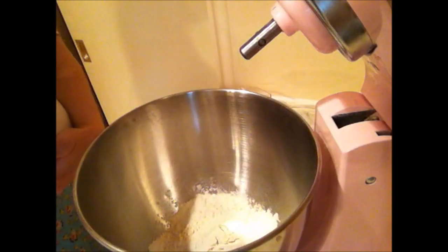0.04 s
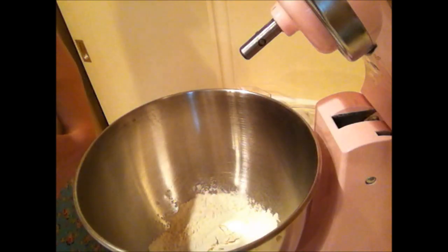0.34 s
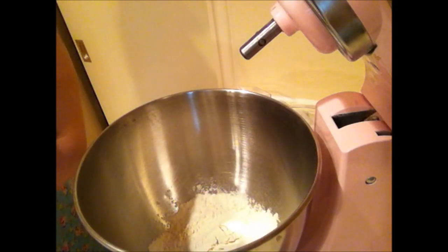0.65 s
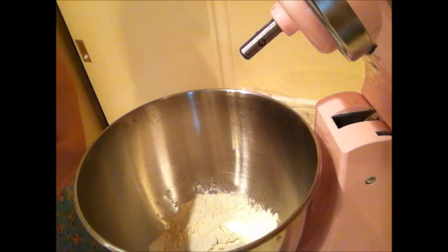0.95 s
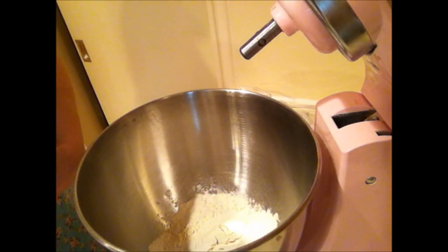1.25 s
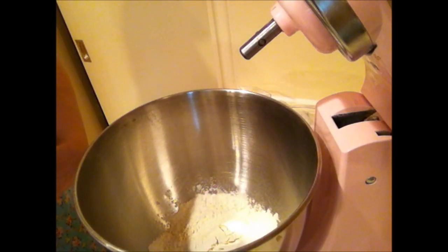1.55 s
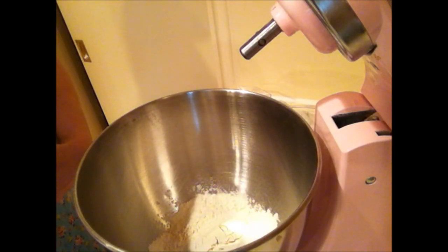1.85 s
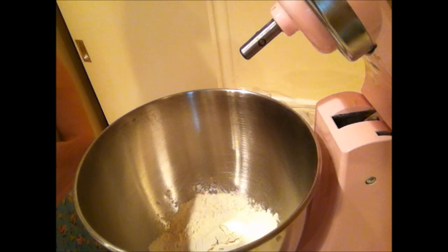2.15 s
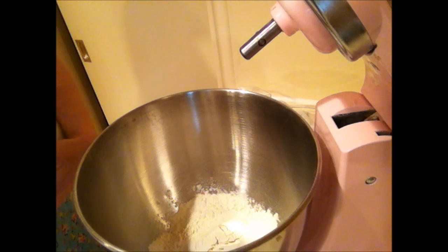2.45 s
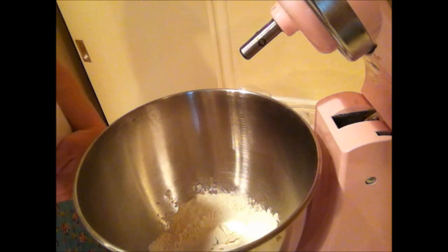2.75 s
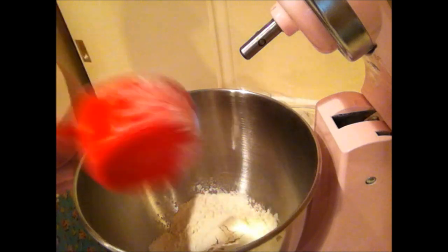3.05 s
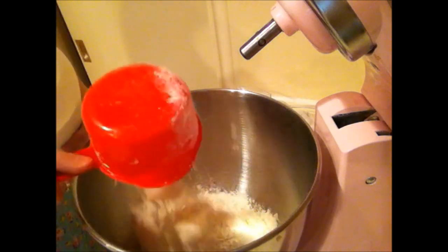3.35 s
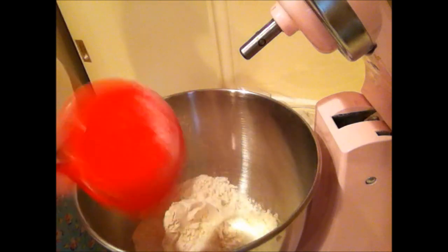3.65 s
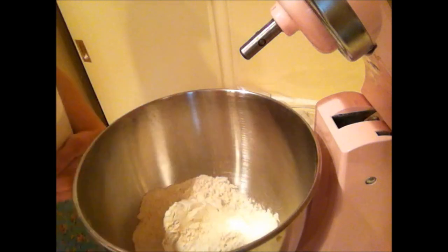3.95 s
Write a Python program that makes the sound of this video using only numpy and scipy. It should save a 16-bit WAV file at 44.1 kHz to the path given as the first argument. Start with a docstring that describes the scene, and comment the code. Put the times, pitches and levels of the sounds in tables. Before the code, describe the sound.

Light taps and scrapes of a cup in flour, ending in two sharp knocks on a bowl.

```python
"""A small kitchen, where an appliance hums and churns faintly. Flour is scooped and levelled in a
plastic measuring cup: light taps crunch, ring the shell and thump the laden body, and scrapes hiss
as tiny slips in the powder. The flour is tipped into a steel mixing bowl and lands in soft thuds.
The empty cup is knocked twice on the rim, and the bowl rings."""
import sys
import numpy as np
from scipy import signal
from scipy.fft import rfft, irfft
from scipy.io import wavfile
from scipy.ndimage import uniform_filter1d

SR = 44100
rng = np.random.default_rng(int(sys.argv[2]) if len(sys.argv) > 2 else 0)


def inscribe(sig):
    """Save sig as 16-bit PCM at rate SR to the path in sys.argv[1].

    A 1-D sig is mono; a 2-D sig holds one channel per row.
    Samples are clipped to [-1, 1] before scaling.
    """
    pcm = np.round(np.clip(np.atleast_2d(sig).T, -1, 1) * 32767)
    wavfile.write(sys.argv[1], SR, pcm.astype(np.int16))


N = 176400
T = np.arange(N) / SR


def from_db(db):
    """Decibels to gain."""
    return 10 ** (np.asarray(db) / 20)


def unit_rms(x):
    """Scale to rms 1."""
    return x / np.sqrt(np.mean(x ** 2) + 1e-20)


def colour(x, spectrum):
    """Shape a steady signal with an EQ curve; rms 1."""
    hz, db = np.transpose(spectrum)
    bins_hz = np.maximum(np.fft.rfftfreq(N, 1 / SR), 1)
    gain = from_db(np.interp(np.log(bins_hz), np.log(hz), db))
    return unit_rms(irfft(rfft(x) * gain, N))


def noise(spectrum):
    """Coloured noise, rms 1."""
    return colour(rng.standard_normal(N), spectrum)


def clicks(times, db):
    """Single impulses at given times and levels."""
    out = np.zeros(N)
    np.add.at(out, np.clip(np.asarray(times) * SR, 0, N - 1).astype(int), from_db(db))
    return out


def decay(hits, t60):
    """Every impulse starts an exponential decay."""
    return signal.lfilter([1], [1, -np.exp(-np.log(1000) / (t60 * SR))], hits + 1e-18)


def low_cut(x, hz):
    """Second-order high-pass."""
    return signal.lfilter(*signal.butter(2, hz, "high", fs=SR), x)


def ring(force, modes, sign=-1):
    """Damped modes, neighbours opposed or (sign=1) in step; each is weak below half its pitch."""
    out = 0
    for k, (hz, db, t60) in enumerate(modes):
        r, w = np.exp(-np.log(1000) / (t60 * SR)), 2 * np.pi * hz / SR
        motion = signal.lfilter([0, np.sin(w)], [1, -2 * r * np.cos(w), r * r], force + 1e-18)
        out = out + sign ** k * from_db(db) * low_cut(motion, hz / 2)
    return out


# EQ of the room tone (frequency [Hz], level [dB])
AIR_EQ = [(25, -9), (60, -22.5), (120, -2), (250, 3), (320, -23), (450, -1), (800, -9), (2500, -21),
          (9000, -29.5), (16000, -39.5)]


def room_air():
    """A steady, dark bed of air."""
    return from_db(-54.5) * noise(AIR_EQ)


# EQ of the churn and of the splash that opens each turn (frequency [Hz], level [dB])
CHURN_EQ = [(150, -26), (320, -7), (390, 4.5), (520, -14.5), (700, -6.5), (850, -25.5), (6000, -59)]
SLOSH_EQ = [(300, -38), (660, 0), (1800, -52)]
# narrow noise bands of the hum (frequency [Hz], level [dB])
HUM_BANDS = [(270, -59), (470, -60)]


def appliance():
    """Over a steady hum, it churns and sloshes about ten times a second, slowly getting quieter."""
    period_s, peak_s, lead_s = 0.1023, 0.275, 0.018
    swing_db, fade_db_per_s, slosh_spread_db = 6, 1.05, 3
    turn = np.cos(2 * np.pi * (T - peak_s) / period_s)
    churn = noise(CHURN_EQ) * from_db(-55.5 + swing_db * turn - fade_db_per_s * T)
    hum = sum(from_db(db) * unit_rms(ring(rng.standard_normal(N), [(hz, 0, 0.45)]))
              for hz, db in HUM_BANDS)
    times = np.arange(peak_s % period_s, T[-1], period_s) - lead_s
    slosh_db = -53.5 - fade_db_per_s * times + slosh_spread_db * rng.standard_normal(len(times))
    slosh = noise(SLOSH_EQ) * decay(clicks(times, slosh_db), t60=0.1)
    return churn + slosh + hum


# light taps on the full cup, ahead of each layer's trim
# (time [s], level [dB], thump offset [dB], edge offset [dB], shell brightness [dB/octave])
CUP_TAPS = [(0.0533, -30, -25, -5.5, 0), (0.0588, -33.5, -12, -11, 2), (0.0875, -25.5, -23, -14, 5.5),
            (0.0942, -33, -6.5, -12, -1.5), (1.0490, -41, -8, -8, 6), (1.4042, -45, -25, -10.5, 4),
            (1.5585, -34, -11, -12.5, 7), (1.7113, -45.5, -10, -10, 1), (1.8346, -38.5, 1.5, -18, 0),
            (1.9758, -41.5, 6, -14.5, -7.5), (2.0935, -42.5, 8, -14, -6), (2.14, -41.5, -19, -18, -1),
            (2.2207, -46.5, 5.5, -9.5, -2), (2.2653, -44, -29, -18, 3), (2.3895, -38.5, -2.5, -20, 0.5),
            (2.522, -28.5, -4.5, -24, -4), (2.5552, -41.5, -13, -12.5, -4), (2.6915, -39.5, -3.5, 1.5, -2),
            (2.7208, -39, -11, -13, -1.5), (2.7836, -47, -4, 2, -5)]
# modes of the full cup's shell, as matching lists (frequency [Hz], level [dB], t60 [s])
SHELL_MODE_HZ = [780, 980, 1580, 2180, 2590, 3050, 3620, 3760, 4030, 4700]
SHELL_LEVEL_DB = [-0.5, -1, -6.5, -7, -5.5, 2, 2, 0, 2, -0.5]
SHELL_DECAY_S = [.03, .03, .038, .038, .022, .026, .026, .018, .02, .026]
SHELL_MODES = list(zip(SHELL_MODE_HZ, SHELL_LEVEL_DB, SHELL_DECAY_S))
# modes of its flour-laden body (frequency [Hz], level [dB], t60 [s])
BODY_MODES = [(170, -3.5, 0.036), (255, -4, 0.056), (369.5, -1.5, 0.069)]
# EQ of a tap's crunch and of its crisp edge (frequency [Hz], level [dB])
CRUNCH_EQ = [(200, -12), (900, 0.5), (4800, 1), (5500, -28)]
EDGE_EQ = [(1000, -16), (3500, 11), (5500, 1.5), (7500, 5.5), (10000, 1), (13000, -5.5), (16000, -26)]


def cup_taps():
    """A gritty contact crunches and rings the shell; the heavy body thumps just after."""
    shell_trim_db, thump_trim_db, crunch_trim_db, edge_trim_db = -8.5, 5, -11, -0.5
    contact_s, thump_lag_s, pivot_hz = 0.0033, 0.002, 2800
    grip_detune, spot_spread_db = 0.01, 2.5  # the modes shift with the grip and the spot touched
    shell, t = np.zeros(N + SR), T[:SR // 8]
    for start, level_db, _, _, brightness in CUP_TAPS:
        force = rng.standard_normal(len(t)) * np.exp(-t / contact_s)
        modes = [(hz * (1 + grip_detune * rng.normal()),
                  mode_db + brightness * np.log2(hz / pivot_hz) + spot_spread_db * rng.normal(), t60)
                 for hz, mode_db, t60 in SHELL_MODES]
        first = int(start * SR)
        shell[first:first + len(t)] += from_db(level_db) * ring(force / np.linalg.norm(force), modes)
    times, db, thump_db, edge_db, _ = np.transpose(CUP_TAPS)
    thump = ring(clicks(times + thump_lag_s, db + thump_db + thump_trim_db), BODY_MODES)
    crunch = noise(CRUNCH_EQ) * decay(clicks(times, db + crunch_trim_db), t60=0.053)
    edge = noise(EDGE_EQ) * decay(clicks(times, db + edge_db + edge_trim_db), t60=0.06)
    return from_db(shell_trim_db) * shell[:N] + low_cut(thump, hz=130) + crunch + edge


# strokes through the flour (time [s], attack [s], hold [s], release to -30 dB [s], level [dB],
# shell share [0-1], lip pitch [Hz], lip level re stroke [dB])
SCRAPE_STROKES = [(0.061, 0.0047, 0.04, 0.15, -41, 0.63, 3550, -11),
                  (0.269, 0.088, 0.031, 0.31, -54, 0.04, 4600, -9),
                  (0.439, 0.02, 0.02, 0.31, -65, 0.02, 4040, -4),
                  (0.836, 0.051, 0.053, 0.066, -54.5, 0.01, 4300, -6),
                  (0.942, 0.015, 0.094, 0.031, -51.5, 0.35, 4250, -3.5),
                  (1.487, 0.017, 0.016, 0.061, -57.5, 0.44, 4130, -7),
                  (2.105, 0.02, .012, 0.045, -53, 0.9, 3700, -14),
                  (2.243, 0.028, .005, 0.018, -54, 0.9, 3700, -12),
                  (3.566, 0.033, 0.021, 0.063, -59, 0, 4270, -22)]
# EQ of the powder's hiss (frequency [Hz], level [dB])
POWDER_EQ = [(300, -27), (1000, -6), (4200, 3.5), (5300, 0), (6500, 4), (9000, 1.5), (12000, -4),
             (16000, -17)]


def scrapes():
    """Tiny slips clump as the cup catches; they hiss in the powder and ring the shell and the lip."""
    slips_per_s, spread_db, catch_db, catch_s = 4000, 1.5, 2.5, 0.006
    slips = (rng.random(N) < slips_per_s / SR) * rng.choice([-1, 1], N)
    slips = slips * from_db(spread_db * np.minimum(rng.exponential(1, N), 4))
    catching = unit_rms(uniform_filter1d(rng.standard_normal(N), size=int(catch_s * SR)))
    slips = slips * from_db(catch_db * catching)
    hiss = colour(slips, POWDER_EQ)
    shell = unit_rms(ring(slips, SHELL_MODES))
    out = 0
    for start, attack, hold, release, db, share, lip_hz, lip_db in SCRAPE_STROKES:
        t = T - start
        push = np.clip(t / attack, 0, 1) * from_db(-30 * np.maximum(t - attack - hold, 0) / release)
        lip = from_db(lip_db) * unit_rms(ring(slips, [(lip_hz, 0, 0.036)]))
        out = out + from_db(db) * push * (np.sqrt(share) * shell + np.sqrt(1 - share) * hiss + lip)
    return out


# slides across the flour (peak time [s], Gaussian half-width [s], level [dB])
SLIDES = [(1.523, 0.049, -53.5), (2.362, 0.046, -54)]
# their muted EQ (frequency [Hz], level [dB])
SLIDE_EQ = [(500, -6), (1200, 0.5), (1900, -4), (3000, -18.5), (9000, -34)]


def slides():
    """Soft slides across the flour swell and fade."""
    swells = sum(from_db(db) * np.exp(-0.5 * ((T - peak) / width) ** 2) for peak, width, db in SLIDES)
    return noise(SLIDE_EQ) * swells


# flour dropping into the bowl (time [s], level [dB], t60 [s], rustle level re thud [dB])
LUMPS = [(3.382, -42, 0.23, -10.5), (3.476, -48.5, 0.44, 1.5), (3.536, -54, 0.095, 14),
         (3.57, -53.5, 0.14, 13), (3.583, -46.5, 0.085, 10.5)]
# EQ of the thud and of the rustle (frequency [Hz], level [dB])
THUD_EQ = [(50, -26), (110, -10), (200, 5), (300, -11), (900, -39)]
RUSTLE_EQ = [(250, -34), (450, 6), (530, -10), (680, -4), (900, -15), (1300, -17), (10000, -43)]


def flour_fall():
    """Soft lumps land with a thud and a hollow rustle."""
    thud, rustle, out = noise(THUD_EQ), noise(RUSTLE_EQ), 0
    for start, db, t60, rustle_db in LUMPS:
        envelope = uniform_filter1d(decay(clicks([start], db), t60), size=130)  # 3 ms soft attack
        out = out + envelope * (thud + from_db(rustle_db) * rustle)
    return out


# the empty cup hits the rim (time [s])
KNOCK_TIMES = [3.795, 3.951]
# drive of each knock's layers (crack [dB], cup [dB], counter [dB], bowl [dB])
KNOCK_LEVELS = [(-15, -14, -21, -39.5), (-13, -9, -27, -33.5)]
# EQ of the crack and of the bowl's shimmer (frequency [Hz], level [dB])
CRACK_EQ = [(300, -8), (480, 8), (1000, -2), (2000, -8), (4500, 2.5), (5600, -6), (7800, 0.5), (10000, -8),
            (12500, -18), (16000, -38)]
# modes of the empty cup, as matching lists (frequency [Hz], level [dB], t60 [s])
CUP_MODE_HZ = [462, 600, 715, 912, 1340, 2950, 4470, 7400]
CUP_LEVEL_DB = [5, 1, 0, 1.5, -5, -11, -4, -8]
CUP_DECAY_S = [.042, .028, .026, .042, .025, .022, .035, .03]
# modes of the steel bowl, as matching lists (frequency [Hz], level [dB], t60 [s])
BOWL_MODE_HZ = [430, 597, 682, 786, 1034, 1400, 1760, 4395, 4484]
BOWL_LEVEL_DB = [4, -1, 6, -6, -4, -7, -1, -5, -4]
BOWL_DECAY_S = [.25, .17, .75, .6, .5, .5, .14, .28, .28]
# modes of the counter (frequency [Hz], level [dB], t60 [s])
COUNTER_MODES = [(152.8, -3.5, 0.22), (200.4, 5.5, 0.065)]


def rim_knocks():
    """The cup cracks against the rim and touches again at once; cup, bowl and counter all ring."""
    recontact_s, recontact_db = 0.002, -1
    times = np.array(KNOCK_TIMES)
    crack_db, cup_db, counter_db, bowl_db = np.transpose(KNOCK_LEVELS)
    contacts = clicks(times, crack_db) + clicks(times + recontact_s, crack_db + recontact_db)
    crack = from_db(2.5) * noise(CRACK_EQ) * decay(contacts / 2, t60=0.04)
    cup = ring(clicks(times, cup_db), zip(CUP_MODE_HZ, CUP_LEVEL_DB, CUP_DECAY_S), sign=1)
    bowl = ring(clicks(times, bowl_db), zip(BOWL_MODE_HZ, BOWL_LEVEL_DB, BOWL_DECAY_S))
    shimmer = noise(CRACK_EQ) * decay(clicks(times, bowl_db + 2), t60=0.22)  # dense high bowl modes
    thud = ring(clicks(times, counter_db), COUNTER_MODES)
    return low_cut(crack + cup, hz=400) + bowl + shimmer + thud


def kitchen_reverb(x):
    """Diffuse reflections whose treble dies sooner."""
    low_t60_s, treble_t60_s, split_hz, predelay_s = 0.39, 0.3, 3100, 0.014
    t, white = T[:SR // 2], rng.standard_normal(SR // 2)
    low = signal.sosfilt(signal.butter(2, split_hz, fs=SR, output="sos"), white)
    tail = low * from_db(-60 * t / low_t60_s) + (white - low) * from_db(-60 * t / treble_t60_s)
    tail = tail * (t > predelay_s)
    return signal.fftconvolve(x, tail / np.linalg.norm(tail))[:N]


def scene():
    """Mono mix: the handling with a little reverb, over the air and the appliance."""
    handling = cup_taps() + scrapes() + slides() + flour_fall() + rim_knocks()
    return (handling + from_db(-15.5) * kitchen_reverb(handling) + room_air() + appliance())[None]


def record(dry):
    """The loudest peaks are rounded; a small microphone loses the deep bass and the very top."""
    band_hz, cutoff_hz = [58, 12500], 16000
    mic = signal.sosfilt(signal.butter(2, band_hz, "band", fs=SR, output="sos"), np.tanh(dry))
    return signal.sosfilt(signal.cheby2(14, 60, cutoff_hz, fs=SR, output="sos"), mic)


dry = scene()
out = record(dry)
inscribe(out)
```